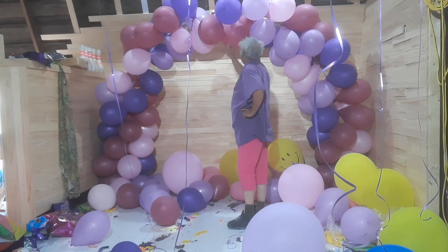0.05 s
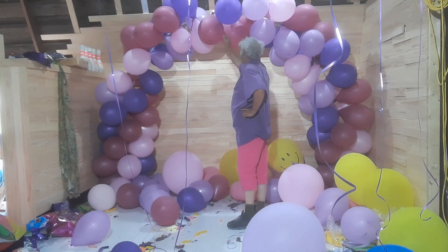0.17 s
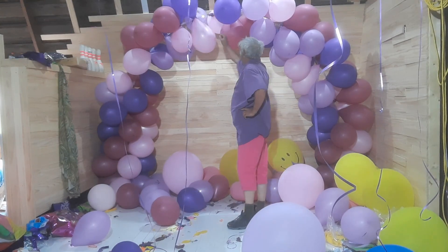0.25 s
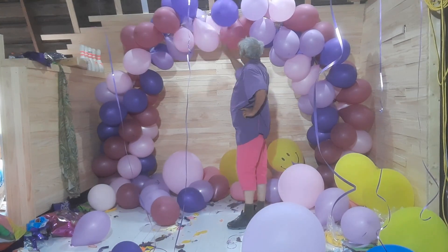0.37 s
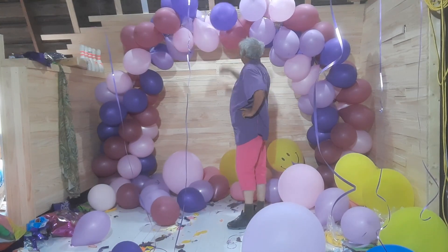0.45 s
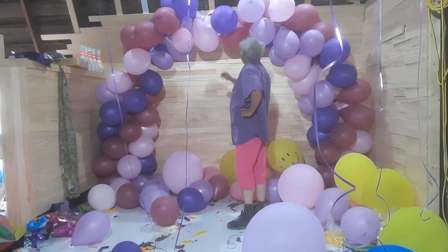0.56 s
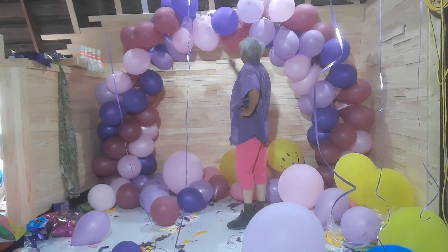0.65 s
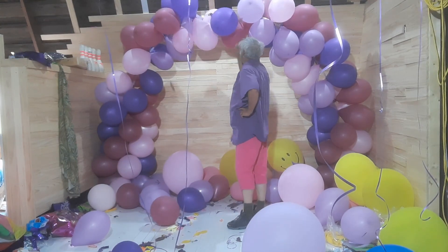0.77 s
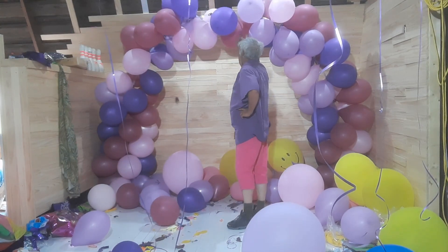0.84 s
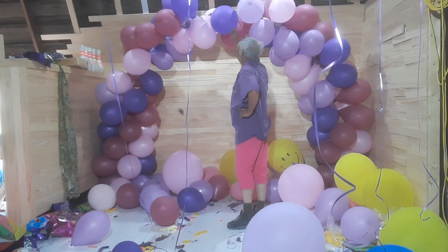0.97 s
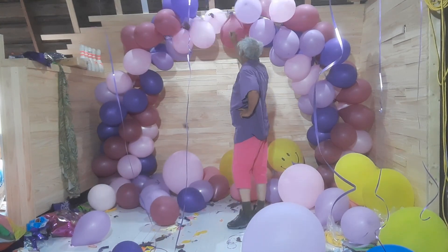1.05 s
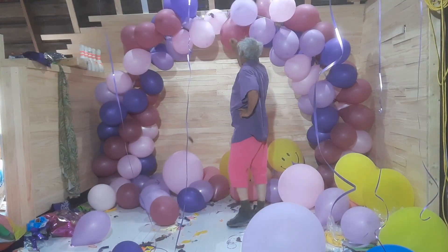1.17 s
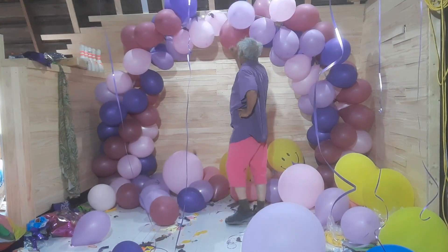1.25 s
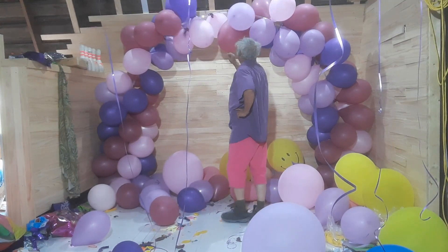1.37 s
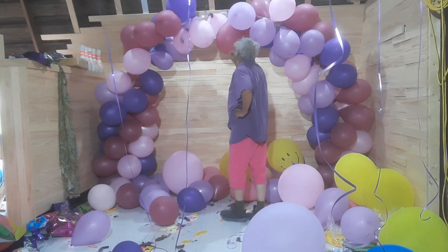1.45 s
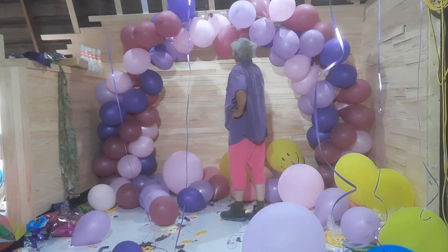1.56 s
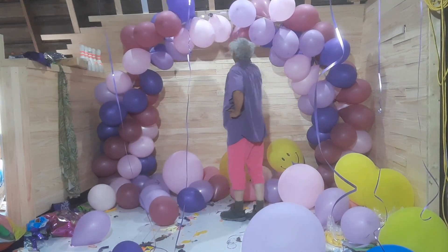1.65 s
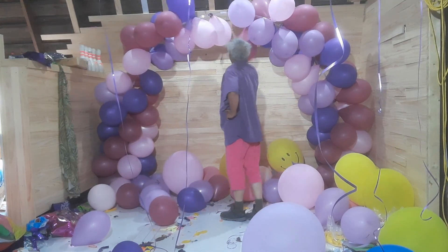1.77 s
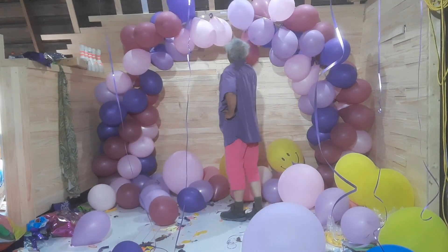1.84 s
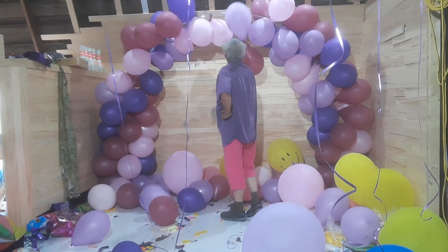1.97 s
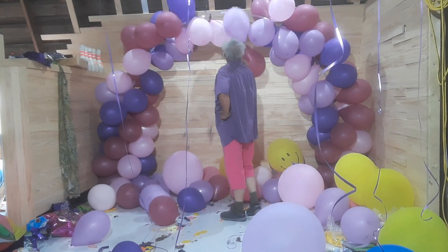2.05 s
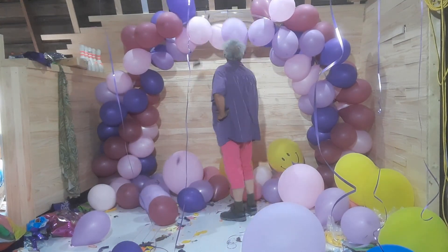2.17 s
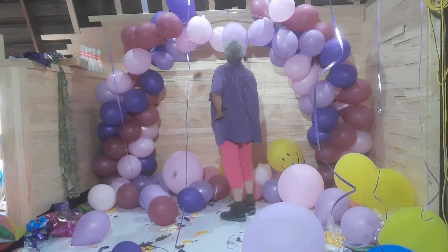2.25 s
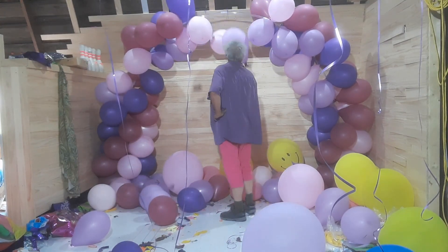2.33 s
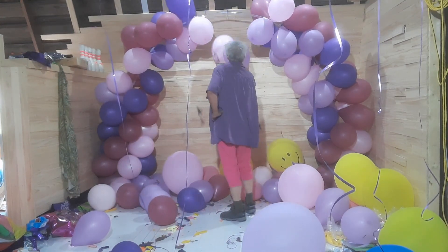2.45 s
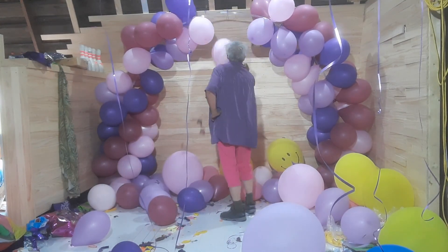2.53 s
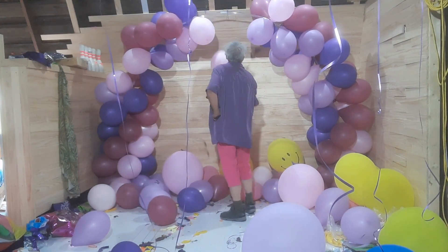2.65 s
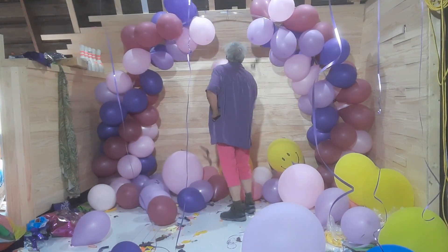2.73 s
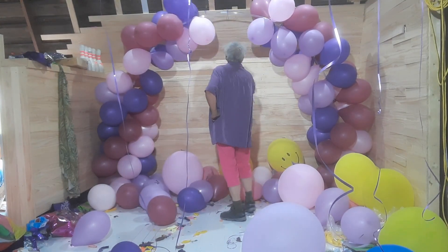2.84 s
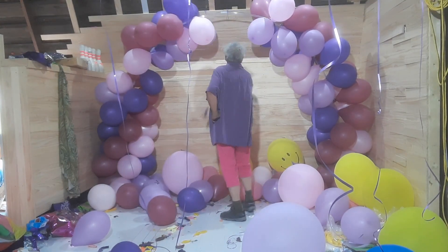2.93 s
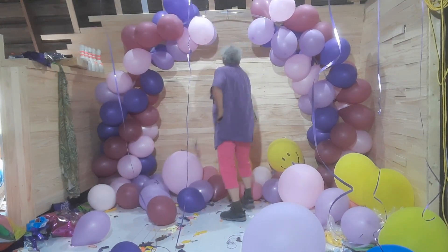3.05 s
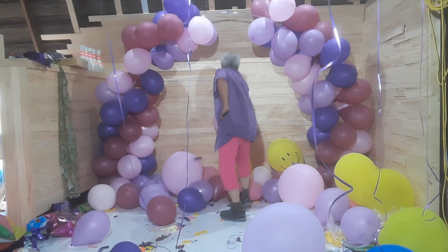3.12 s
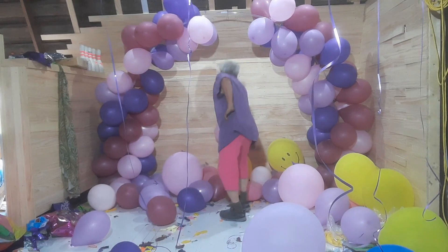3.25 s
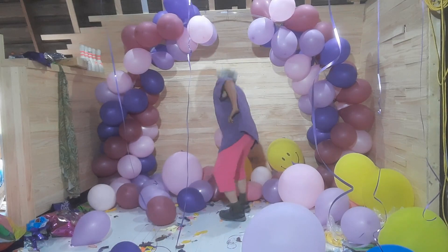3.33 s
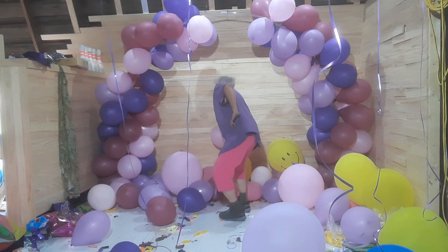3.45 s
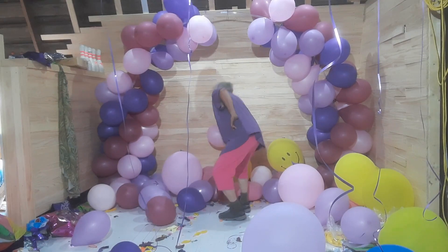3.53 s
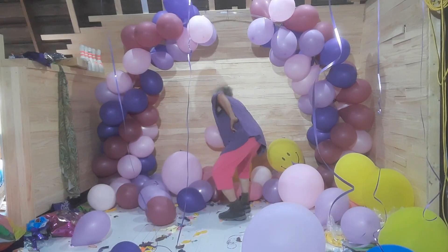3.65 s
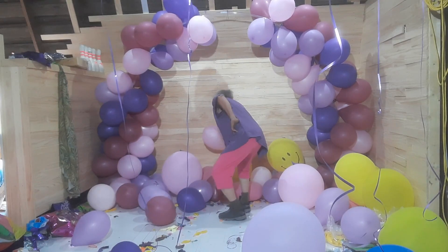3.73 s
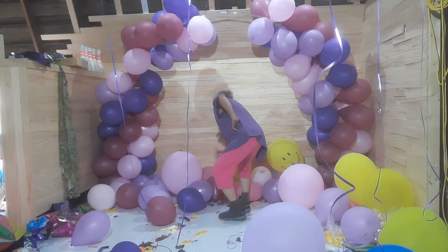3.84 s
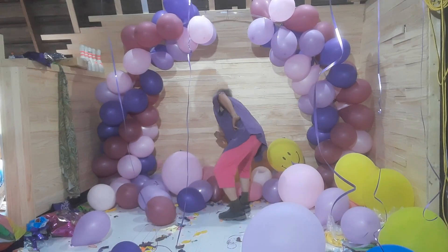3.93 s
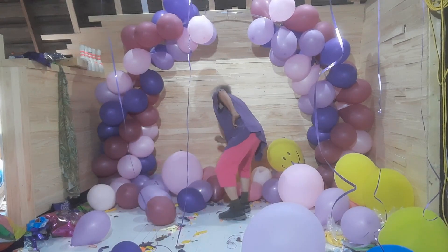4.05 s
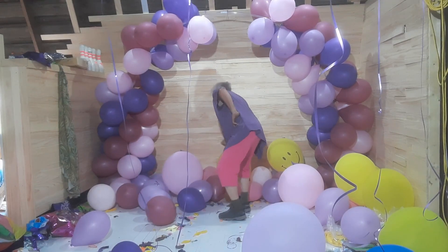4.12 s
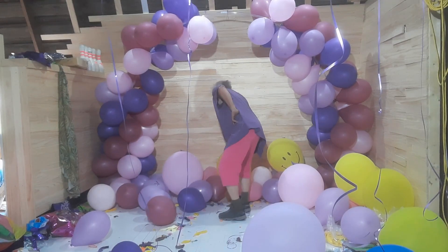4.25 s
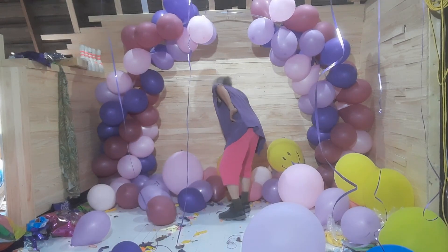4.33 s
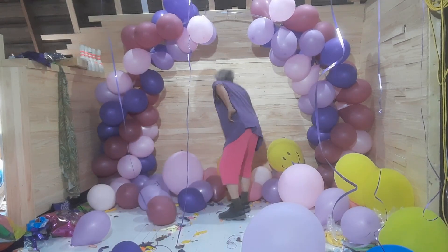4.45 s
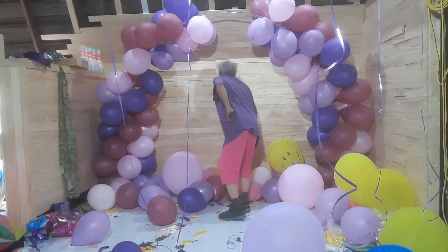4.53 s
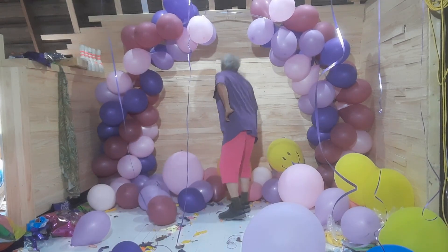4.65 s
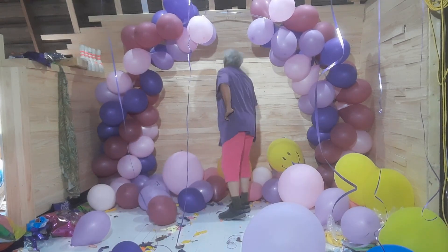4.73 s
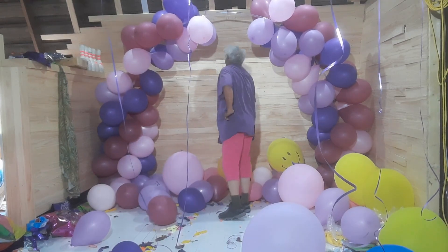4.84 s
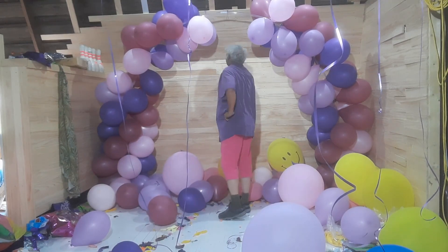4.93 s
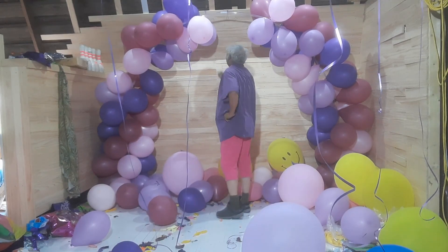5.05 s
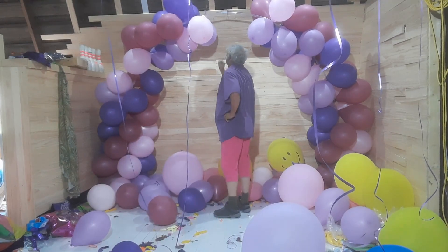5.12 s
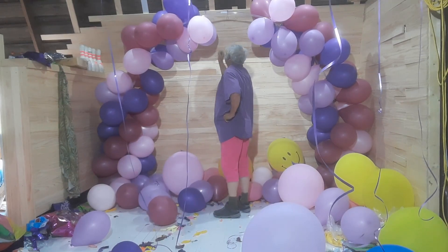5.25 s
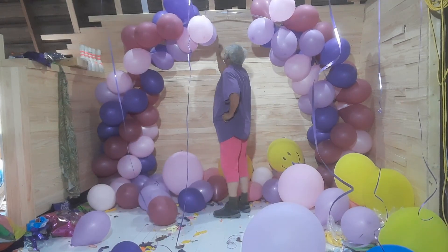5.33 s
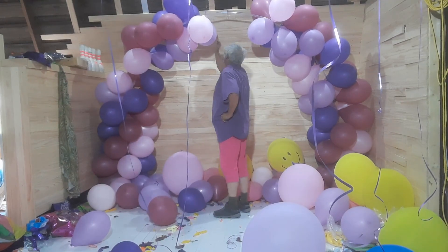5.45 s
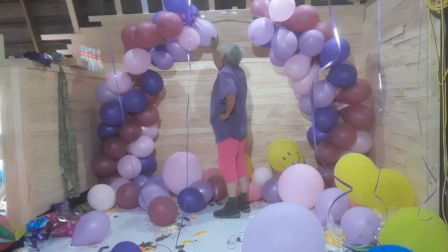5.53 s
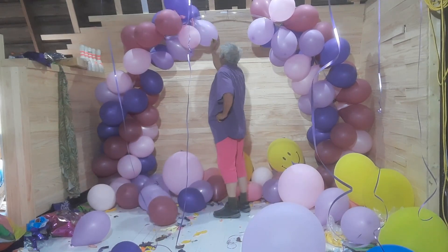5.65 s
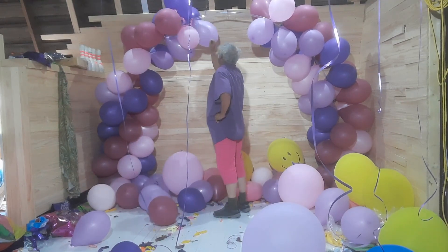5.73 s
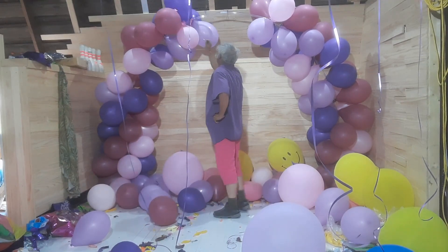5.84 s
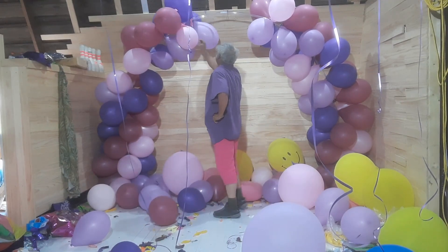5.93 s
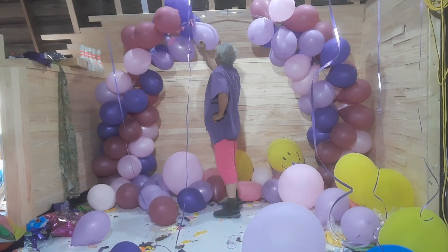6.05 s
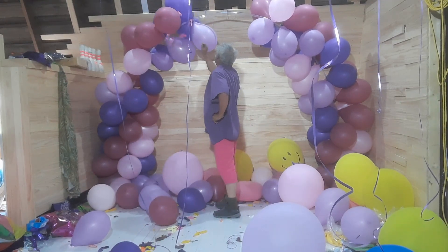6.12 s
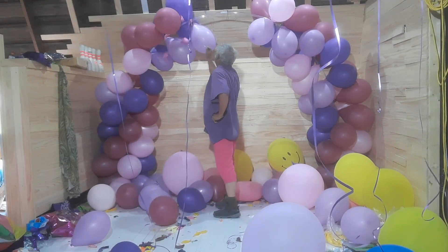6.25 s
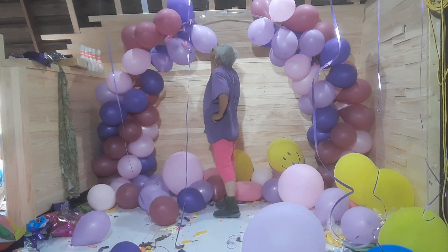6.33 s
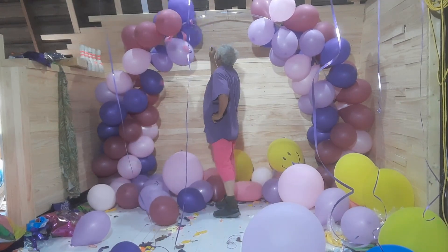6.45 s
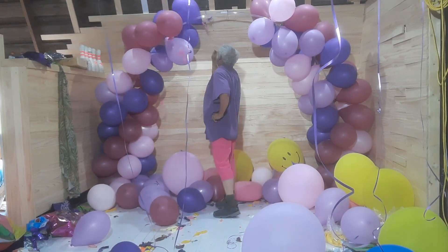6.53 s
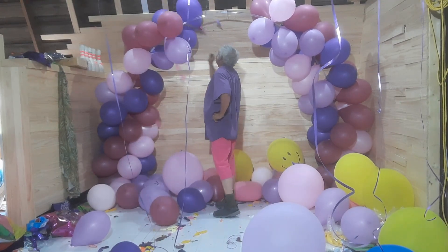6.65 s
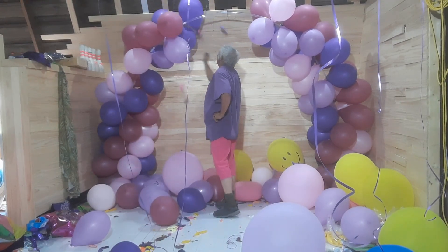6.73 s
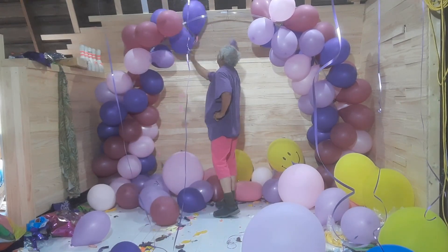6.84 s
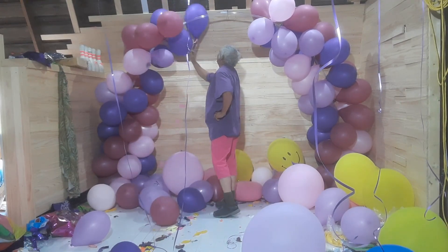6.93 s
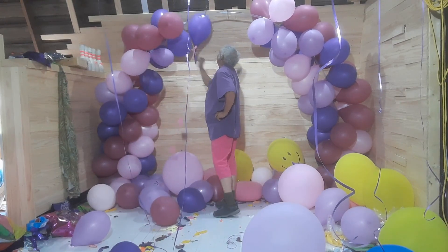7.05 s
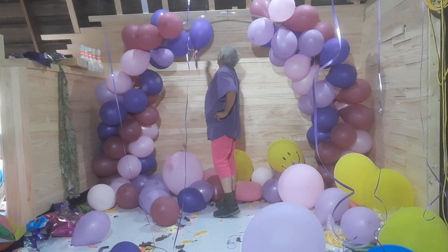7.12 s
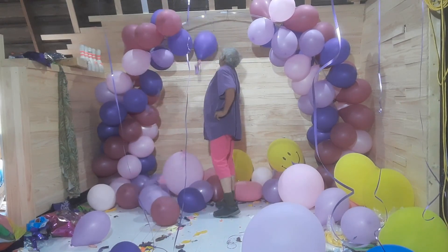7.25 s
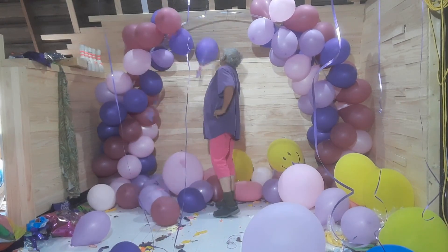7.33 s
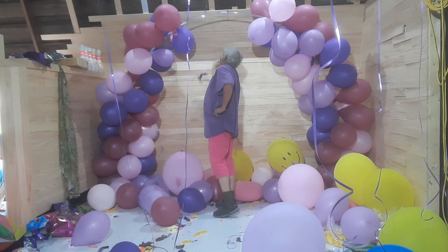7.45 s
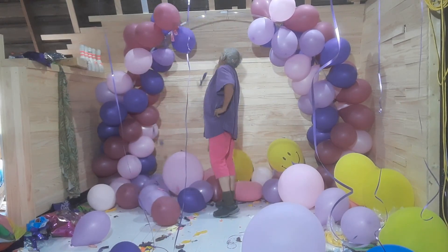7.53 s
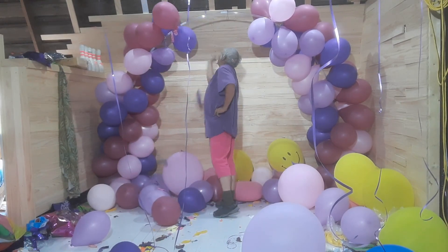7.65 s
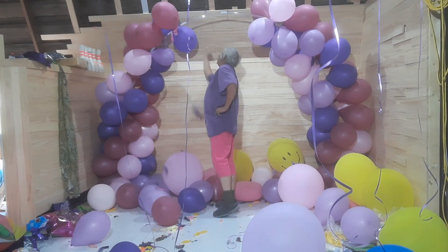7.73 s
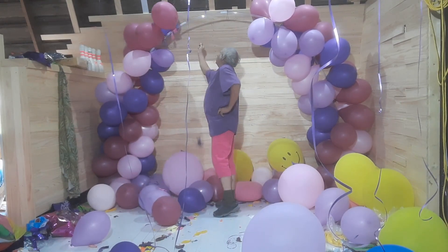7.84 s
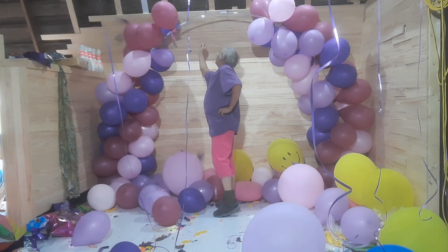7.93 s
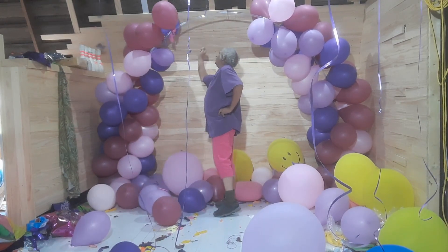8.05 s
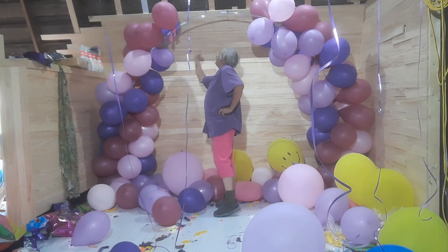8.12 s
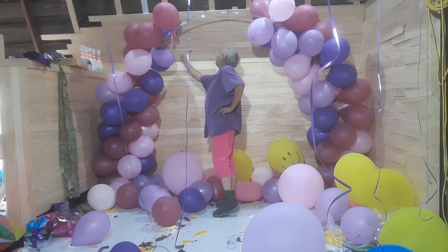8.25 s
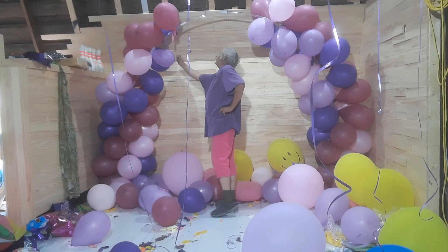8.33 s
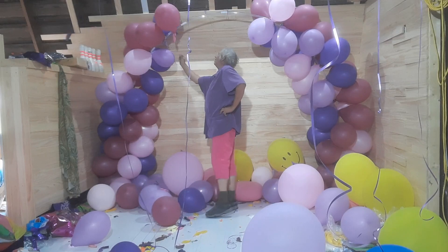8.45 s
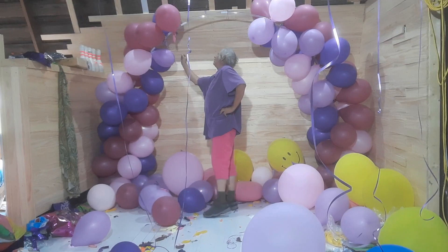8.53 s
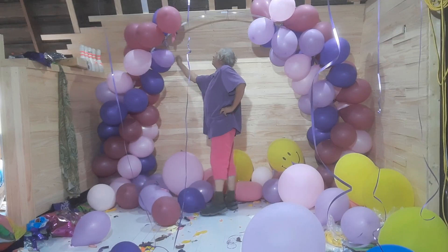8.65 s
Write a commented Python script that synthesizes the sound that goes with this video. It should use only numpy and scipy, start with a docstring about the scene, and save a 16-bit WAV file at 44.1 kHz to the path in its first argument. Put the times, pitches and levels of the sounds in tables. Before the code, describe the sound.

Latex balloons are pricked one by one in a plywood booth inside a hall. Five sharp bangs come in under three seconds, each with a short, boxy echo and a faint lingering ring. Balloons then softly bump and rub around a single burst. After a pause, six more pops follow about half a second apart, one of them weaker. A faint rub closes the sequence, heard from a stereo microphone a few metres away.

```python
"""Twelve latex balloons are pricked on an arch in a plywood booth inside a larger hall.
After a soft rub and shifting boots come five bursts, each a crack of tearing latex and a short swing
of released air, thrown about by the close walls and trailed by a faint, lingering ring.
Balloons then bump and rub around a lone sixth burst; six more follow from 5.6 s, their peaks rounded
by a stereo microphone a few metres off. A last rub, a faint hum and a boot close the scene."""
import sys
import numpy as np
from scipy import signal
from scipy.fft import rfft, irfft
from scipy.io import wavfile
from scipy.ndimage import uniform_filter1d

SR = 44100
rng = np.random.default_rng(int(sys.argv[2]) if len(sys.argv) > 2 else 0)


def to_wav(s):
    """Save 16-bit WAV."""
    ch = np.atleast_2d(s).T  # columns
    pcm = np.round(np.clip(ch, -1, 1) * 32767)  # PCM
    wavfile.write(sys.argv[1], SR, pcm.astype(np.int16))


N = 382788
LENGTH = 32768  # samples in one event
T = np.arange(LENGTH) / SR
HZ = np.fft.rfftfreq(LENGTH, 1 / SR)
LEFT_RIGHT = np.array([[1], [-1]])
PORT_GAP_S, RIGHT_LAG_S = .00034, .00028  # travel between microphone ports; lag of direct sound


def undb(db):
    return 10 ** (np.asarray(db) / 20)


def curve(points, hz):
    """Read (Hz, value) points on a log-frequency axis."""
    at, value = np.transpose(points)
    return np.interp(np.log(hz + 1), np.log(at), value)


def fade(t, t60):
    """Amplitude that loses 60 dB in t60."""
    return np.exp(-np.log(1000) * t / t60)


def add(out, s, sound):
    """Mix a stereo sound in at time s."""
    i = max(int(s * SR), 0)
    out[:, i:i + sound.shape[1]] += sound[:, :N - i]


def tone(bass_db, mid_db, treble_db):
    """Three-band EQ against the body near 400 Hz."""
    points = [(140, bass_db), (300, 0), (600, 0), (1300, mid_db), (2800, mid_db), (6500, treble_db)]
    return undb(curve(points, HZ))


def resonances(modes, hz):
    """Gain of a few (Hz, width Hz, dB) humps."""
    return undb(sum(db / (1 + (2 * (hz - centre) / width) ** 2) for centre, width, db in modes))


# Stereo tilt of diffuse sound: f/Hz, left minus right/dB
STEREO_TILT = [(60, -2.5), (200, 0), (380, 0), (650, -5.5), (1300, -.5), (2400, -0.5), (4400, 0), (8100, 2),
               (14000, 6.5)]
def diffuse(colour, size=LENGTH):
    """Spectrum of noise from all sides: long waves reach both ports alike, short ones do not."""
    hz = np.fft.rfftfreq(size, 1 / SR)
    mid, side = rfft(rng.standard_normal((2, size)))
    alike = .96 * np.sinc(2 * hz * PORT_GAP_S)
    pair = mid * np.sqrt((1 + alike) / 2) + LEFT_RIGHT * side * np.sqrt((1 - alike) / 2)
    balance = undb(LEFT_RIGHT * curve(STEREO_TILT, hz) / 2)
    gain = undb(curve(colour, hz))
    return pair * balance * gain / np.sqrt(np.mean(gain ** 2))


# Colour of the room tone: f/Hz, relative level/dB
ROOM_TONE_COLOUR = [(25, -14.5), (60, -3), (130, 0.5), (280, -9), (550, -7.5), (1000, -17), (1600, -14),
                    (3200, -20), (6500, -16.5), (9200, -11.5), (11500, -21), (16000, -28.5)]
def room_tone():
    """The hall's very quiet, steady bed of noise."""
    return undb(-75.5) * irfft(diffuse(ROOM_TONE_COLOUR, 2 * N))[:, :N]


# Colour of the lingering ring: f/Hz, relative level/dB
RING_COLOUR = [(30, -16.5), (170, -6.5), (290, -9), (480, 1.5), (1050, -13), (1700, -3.5), (2700, -9.5),
               (4000, -21), (7000, -25), (9200, -15), (11000, -28), (16000, -28.5)]
# Resonances in that ring: f/Hz, width/Hz, boost/dB
RING_MODES = [(482, 80, 4.5), (2620, 390, 8.5)]
def lingering_ring():
    """A faint ring that lingers after each burst, probably the intact balloons resonating."""
    size = 2 * LENGTH
    modes = resonances(RING_MODES, np.fft.rfftfreq(size, 1 / SR))
    return irfft(diffuse(RING_COLOUR, size) * modes) * fade(np.arange(size) / SR, t60=3.2)


# Standing waves between the boards: f/Hz, width/Hz, boost/dB
BOOTH_MODES = [(175, 26, 4.5), (278, 36, 3.5), (366, 20, 3.5), (470, 26, 2.5), (598.4, 48, 2.5)]
def boxiness():
    """Gain of the booth's standing waves in the low mids."""
    return resonances(BOOTH_MODES, HZ)


# Reverb time of the booth: f/Hz, t60/s
BOOTH_DECAY = [(40, 0.38), (200, 0.46), (450, 0.39), (1000, .45), (2400, 0.44), (4500, 0.43), (9000, 0.36),
               (16000, 0.33)]
def booth_echo(spectrum, hold_s, rise_s):
    """Reflections pile up between close walls, the lows last; they hold, then die, the treble first."""
    out = 0
    decay_time = np.hypot(T, hold_s) - hold_s
    centres = [hz for hz, _ in BOOTH_DECAY]
    for (hz, t60), weights in zip(BOOTH_DECAY, np.eye(len(centres))):
        band = curve(list(zip(centres, weights)), HZ)
        build_up = 1 - np.exp(-T / (rise_s + 2 / (hz + 200)))
        out = out + irfft(spectrum * band) * fade(decay_time, t60) * build_up
    return out


# Colour of a soft knock: f/Hz, relative level/dB
CONTACT_COLOUR = [(25, -20.5), (60, -2.5), (110, -1), (170, 1.5), (270, -7), (450, -2.5), (720, -5),
                  (1100, -13), (1700, -15.5), (3200, -33.5), (9000, -36.5), (16000, -49.5)]
def contact(eq):
    """A soft contact excites mostly the low end of the booth."""
    return booth_echo(diffuse(CONTACT_COLOUR) * eq * boxiness(), hold_s=.008, rise_s=.00081)


def air_swing(hz, rise_s, decay_s):
    """Air starts gently, overshoots and swings to rest; it reaches the left port first."""
    t = np.maximum(T - np.array([[0], [RIGHT_LAG_S]]), 0)
    swell = (1 - np.exp(-t / rise_s)) ** 2 * np.exp(-t / decay_s)
    return np.sin(2 * np.pi * hz * t) * swell / swell.max()


# Nudged balloons: t/s, level/dB, f/Hz
HUMS = [(.85, -66, 475.5), (8.448, -62.5, 458.5)]
def balloon_hums():
    """A nudged balloon hums briefly on one note."""
    out = np.zeros((2, N))
    for s, db, hz in HUMS:
        add(out, s, undb(db) * air_swing(hz, rise_s=.025, decay_s=.035))
    return out


def stroke(length_s, attack_s=.014, slips_per_s=200, slip_db=1.5):
    """A rub swells, holds and dies away; small uneven slips shake its level."""
    slips = undb(slip_db * np.interp(T * slips_per_s, np.arange(LENGTH), rng.standard_normal(LENGTH)))
    return slips * np.minimum(T / attack_s, 1) * fade(np.maximum(T - length_s, 0), t60=.42)


# Colour of the friction hiss: f/Hz, relative level/dB
RUB_COLOUR = [(300, -8), (1500, -0.5), (3000, -1), (4500, -3.5), (7000, -1), (9300, 1), (11000, -8),
              (16000, -18)]
# Strokes of latex on cloth and latex: t/s, length/s, hiss level/dB, drumming level/dB
RUBS = [(0, 0.11, -65, -84), (3.189, 0.085, -67.5, -59.5), (3.39, .24, -68.5, -61.5),
        (3.71, 0.21, -71.5, -63), (4.38, 0.13, -75.5, -69), (4.94, .05, -71, -60), (8.41, .07, -67.5, -68)]
def latex_rubs():
    """Rubbed latex hisses and drums on the balloon."""
    out = np.zeros((2, N))
    skin = tone(bass_db=-6.5, mid_db=6, treble_db=0) * boxiness()
    for s, length_s, hiss_db, drum_db in RUBS:
        hiss = undb(hiss_db) * diffuse(RUB_COLOUR)
        drumming = undb(drum_db) * diffuse(CONTACT_COLOUR) * skin
        add(out, s, irfft(hiss + drumming) * stroke(length_s))
    return out


# Boot thuds: t/s, level before EQ/dB
THUDS = [(0.016, -60), (0.058, -62.5), (3.37, -59), (5.13, -71.5), (6.139, -51), (6.218, -52.5),
         (6.31, -53.5), (8.62, -76)]
def boot_thuds():
    """Boots shift on the floor, all with the same deep colour."""
    out = np.zeros((2, N))
    for s, db in THUDS:
        add(out, s, undb(db) * contact(tone(bass_db=17, mid_db=-5, treble_db=-6)))
    return out


# Balloon knocks: t/s, level/dB, hardness as lift of mids and treble/dB
BUMPS = [(3.224, -52.5, -3), (3.242, -46.5, -15.5), (3.291, -41.5, 3), (3.355, -39, -0.5),
         (3.722, -44, 2.5), (3.886, -45.5, 2), (4.94, -44, -5.5), (5.25, -52.5, -6.5), (6.028, -41, -3.5),
         (6.862, -58.5, 3)]
def balloon_bumps():
    """Balloons knock on each other and the boards and ring briefly; harder knocks are brighter."""
    out = np.zeros((2, N))
    ring = undb(-1.5) * air_swing(hz=410, rise_s=.004, decay_s=.009)
    for s, db, hard_db in BUMPS:
        knock = contact(tone(bass_db=-.5, mid_db=hard_db, treble_db=hard_db - 7.5))
        add(out, s, undb(db) * (ring + knock))
    return out


def slaps(count, span_s, width_s):
    """Single sharp reflections off the nearest boards, each from its own direction."""
    out = np.zeros((2, LENGTH))
    early = slice(LENGTH // 8)
    for when, angle, size in rng.random((count, 3)):
        arrival_s = .002 + when * span_s + LEFT_RIGHT * (angle - .5) * PORT_GAP_S
        t = (T[early] - arrival_s) / width_s
        pulse = -t * np.exp((1 - t ** 2) / 2)
        out[:, early] += size * (1 - when / 2) * pulse
    return out


def with_rebounds(swing, delays_s, db):
    """Floor and back wall each return the air swing once, by a path that varies with the balloon."""
    out = swing.copy()
    for delay_s in delays_s:
        lag = int(delay_s * rng.uniform(.8, 1.2) * SR)
        out[:, lag:] += undb(db) * swing[:, :-lag].mean(axis=0)
    return out


def tear_colour(length_s, depth_db):
    """A tear lasts milliseconds and is never the same twice: broad humps between narrow dips."""
    wiggle = rfft(rng.standard_normal(LENGTH) * np.exp(-(T / length_s) ** 2)).real
    humps = np.minimum(wiggle / wiggle.std(), .8)
    gain = undb(depth_db * humps * HZ / (HZ + 1200))
    return gain / np.sqrt(np.mean(gain ** 2))


def crack(spectrum, rise_s, decay_s):
    """The tear heard directly: a snap with thinned lows that reaches the left port first."""
    low_cut = HZ / (HZ + 1500)
    snap = irfft(spectrum[0] * low_cut) * (1 - np.exp(-T / rise_s)) * np.exp(-T / decay_s)
    return np.array([snap, np.interp(T - RIGHT_LAG_S, T, snap, left=0)])


# Colour of a burst in the booth: f/Hz, relative level/dB
POP_COLOUR = [(25, -33), (55, -13), (110, -11), (180, -4.5), (290, -2), (610, 0.5), (760, -5), (1050, -12),
              (2300, -10), (3800, -20.5), (6800, -17), (8900, -14.5), (10500, -24), (12200, -24),
              (16000, -33)]
# Pricked balloons: t/s, level/dB, air swing f/Hz, bass/dB, brightness/dB
POPS = [(0.3006, -11, 360, 0.5, -0.8), (1.0805, -11, 416, -0.5, 3.5), (1.7287, -10, 423, -2, -2),
        (2.2579, -12, 415, -1, 2.2), (2.5981, -11.5, 423, -2, -0.4), (3.9208, -13, 335, 5.5, 1.7),
        (5.5734, -11.5, 364, 0, 0.44), (6.0931, -24, 336, -4, 3), (6.4835, -13, 373, 1, 4.8),
        (6.9397, -12, 344, -3, -1.3), (7.448, -12.5, 428, 0.5, 2), (7.918, -13, 395, 0, 3.9)]
def balloon_pops():
    """Latex cracks and the freed air swings; the boards slap back, the booth echoes, a ring lingers."""
    out = np.zeros((2, N))
    pan = undb(LEFT_RIGHT * .02)  # near centre
    early_window = (1 - np.exp(-T / .002)) * np.exp(-(T / .07) ** 2)
    for s, db, hz, bass_db, bright_db in POPS:
        eq = tone(bass_db, mid_db=bright_db, treble_db=.65 * bright_db - 2.02)
        colour = eq * boxiness() * resonances([(hz, 130, 1.5)], HZ)  # the echo carries the swing's pitch
        field = diffuse(POP_COLOUR) * colour
        echo = booth_echo(field, hold_s=.03, rise_s=.0015)
        tear = tear_colour(length_s=.0022, depth_db=5.5)
        # early reflections keep the tear's colour; later ones come from all sides and even it out
        echo += irfft(field * (tear - 1)) * early_window
        echo += undb(2.5) * slaps(count=12, span_s=.05, width_s=.00009)
        snap = undb(3.5) * crack(diffuse(POP_COLOUR) * colour * tear, rise_s=.001, decay_s=.003)
        add(out, s, undb(db) * (echo + snap) * pan)
        swing = undb(db + 8.5) * air_swing(hz, rise_s=.0018, decay_s=.87 / hz)
        add(out, s, with_rebounds(swing, delays_s=(.009, .019), db=-11))
        add(out, s, undb(db - 51) * lingering_ring())
    return out


def scene():
    return balloon_pops() + balloon_bumps() + boot_thuds() + latex_rubs() + balloon_hums() + room_tone()


def suppress(x, knee_db, depth_db):
    """A noise suppressor ducks the sound once it has sunk close to silence."""
    power = np.maximum(uniform_filter1d(np.mean(x ** 2, axis=0), size=2205), 0)  # 50 ms average
    return x * undb(depth_db / (1 + (power / undb(knee_db) ** 2) ** 2))


def record(dry):
    """Hush the pauses, round the highest peaks and cut the top."""
    hushed = suppress(dry, knee_db=-74, depth_db=-18)
    ceiling, top_hz = 1.05, 15900
    rounded = hushed / (1 + (hushed / ceiling) ** 4) ** (1 / 4)
    return signal.sosfilt(signal.ellip(10, .2, 80, top_hz, fs=SR, output="sos"), rounded)


dry = scene()
out = record(dry)
to_wav(out)
```